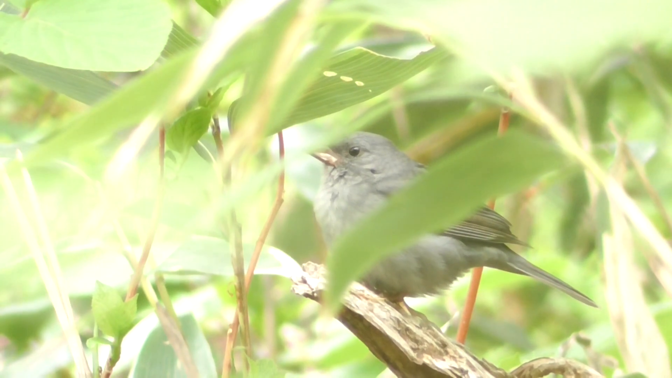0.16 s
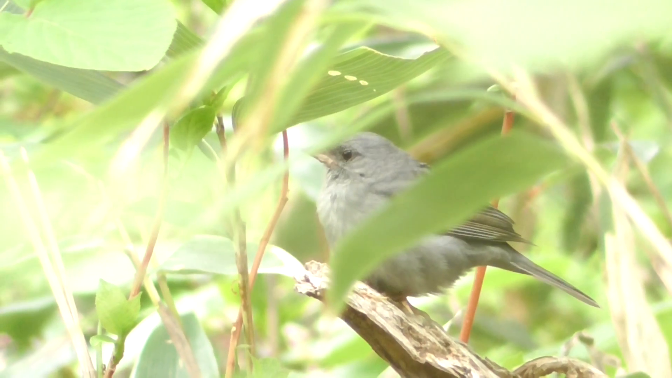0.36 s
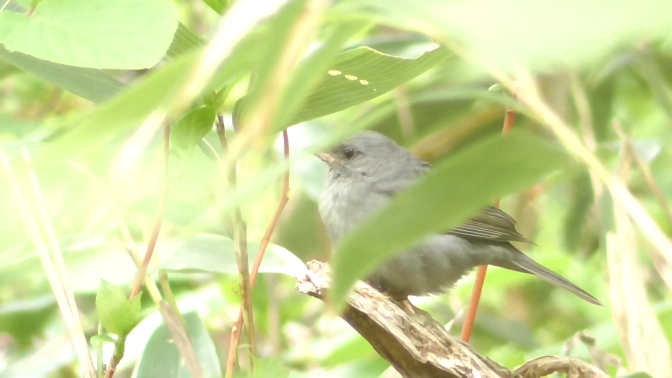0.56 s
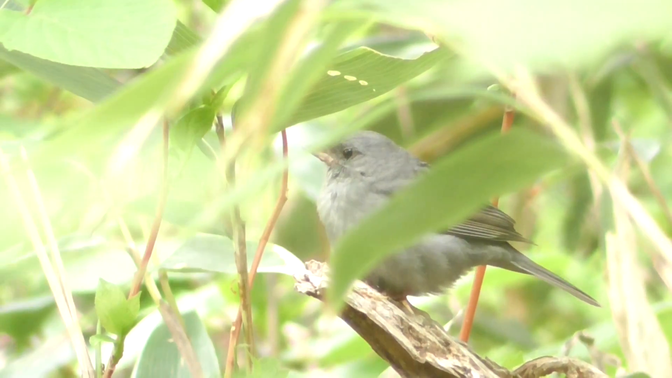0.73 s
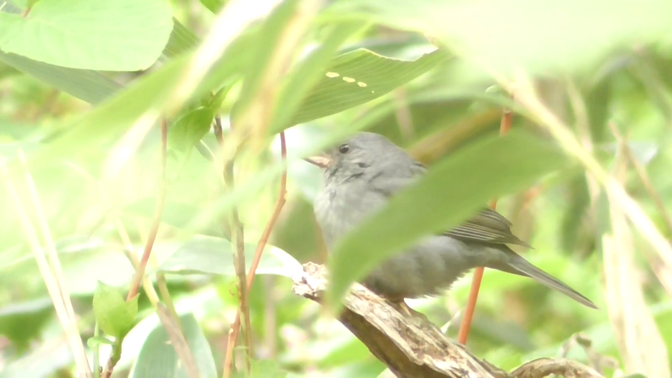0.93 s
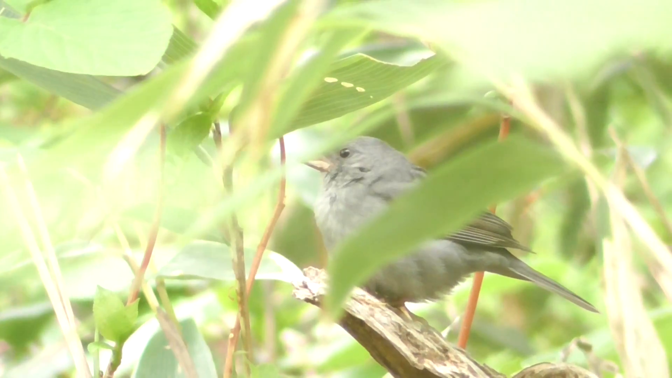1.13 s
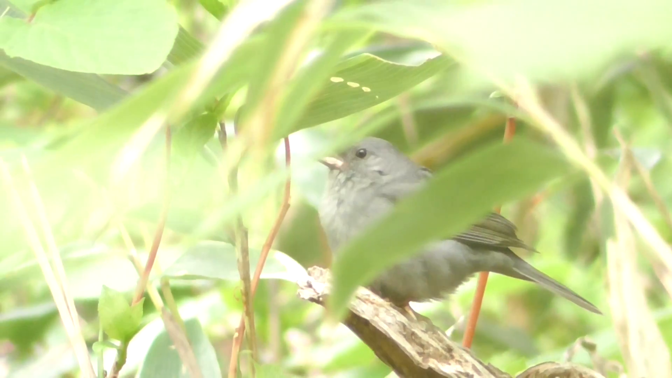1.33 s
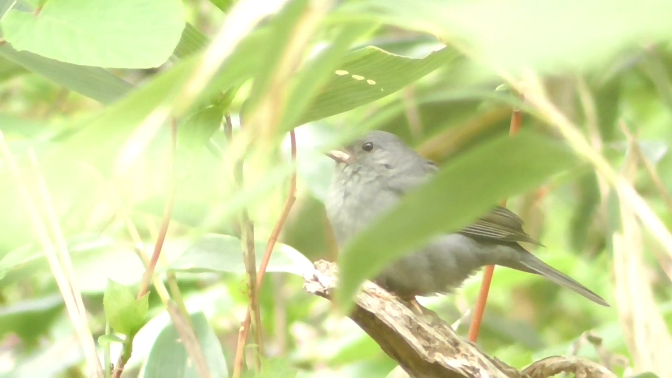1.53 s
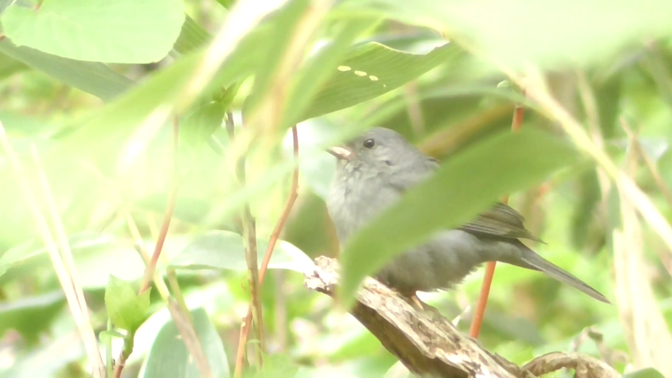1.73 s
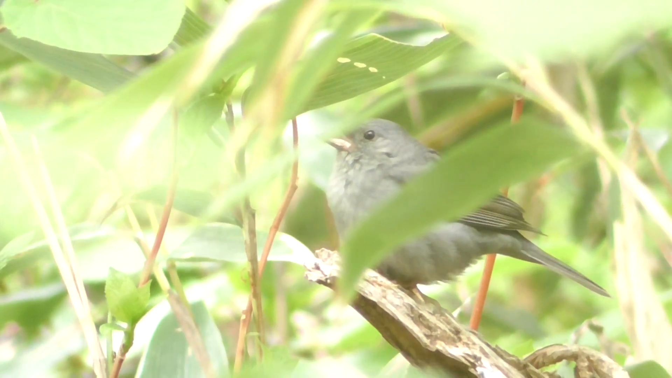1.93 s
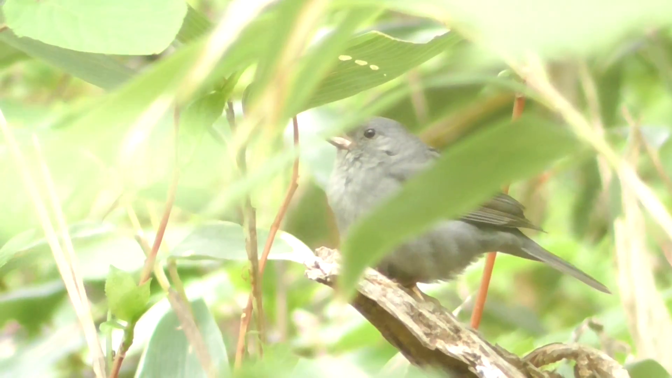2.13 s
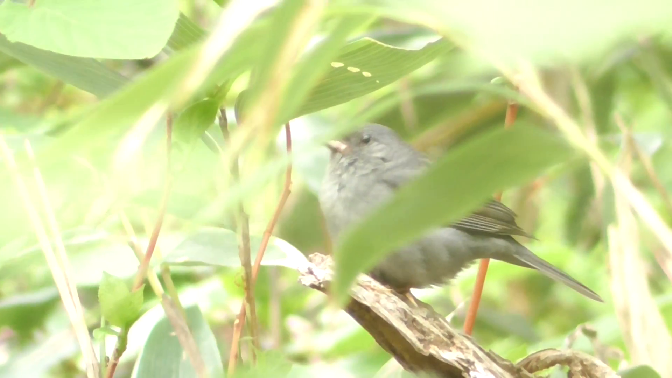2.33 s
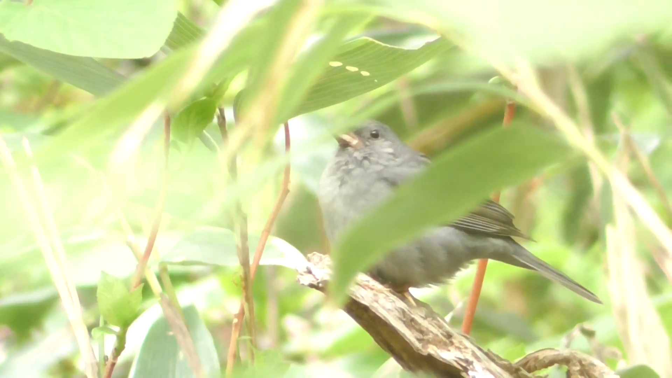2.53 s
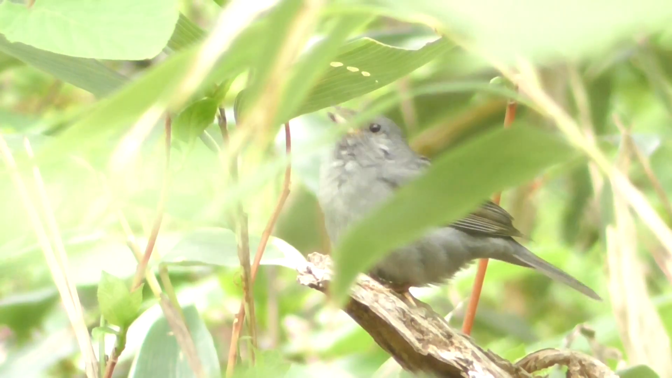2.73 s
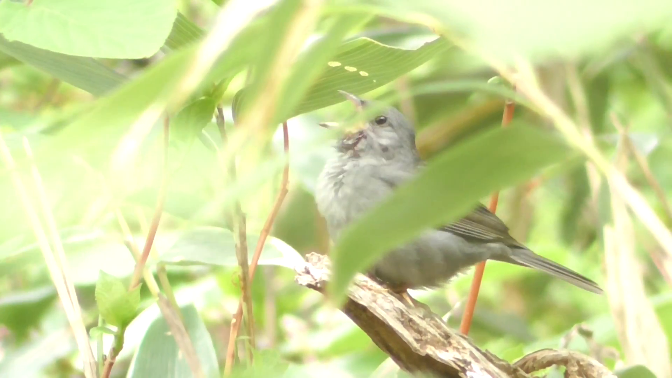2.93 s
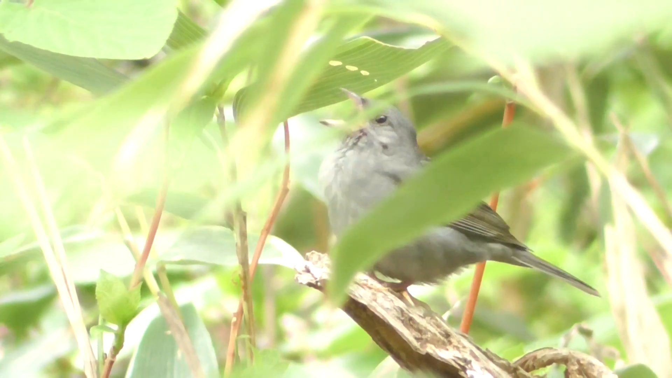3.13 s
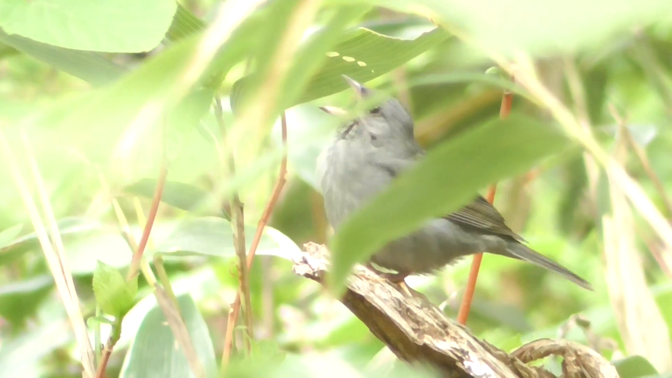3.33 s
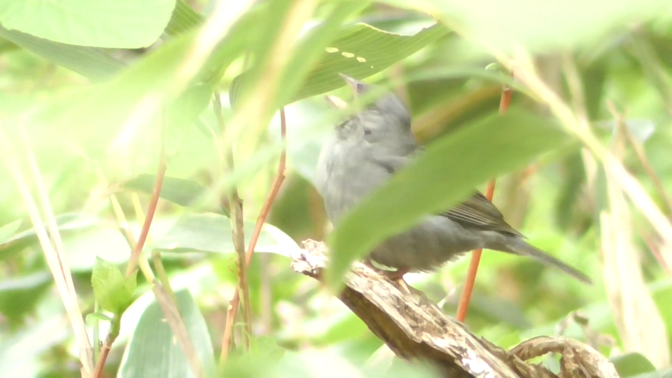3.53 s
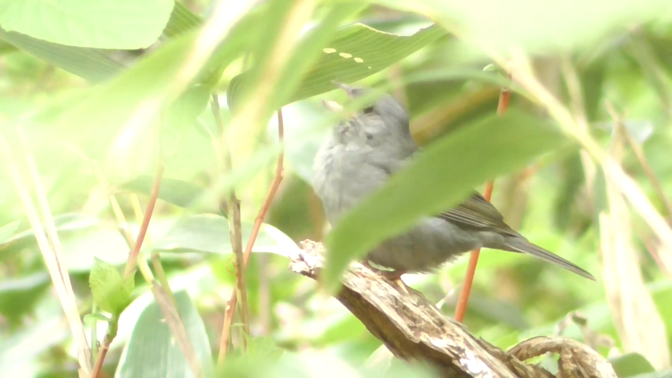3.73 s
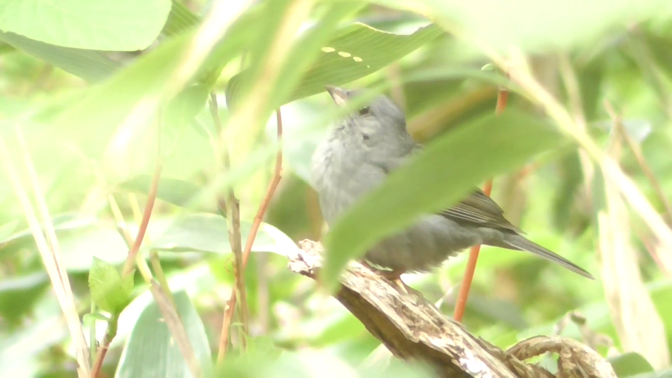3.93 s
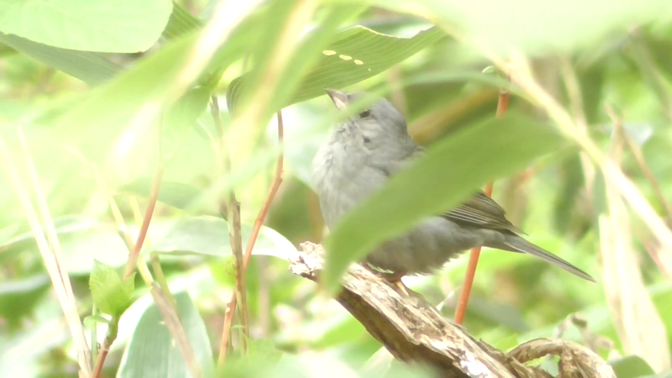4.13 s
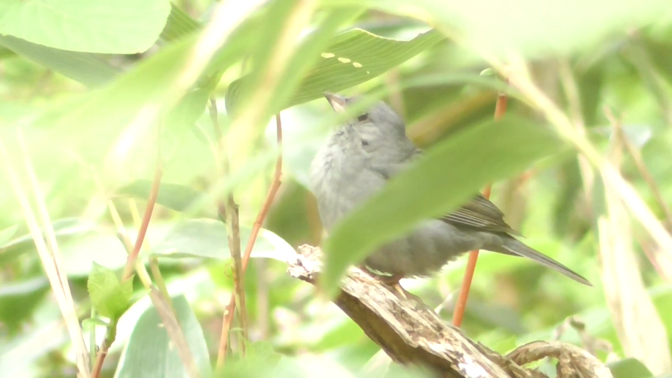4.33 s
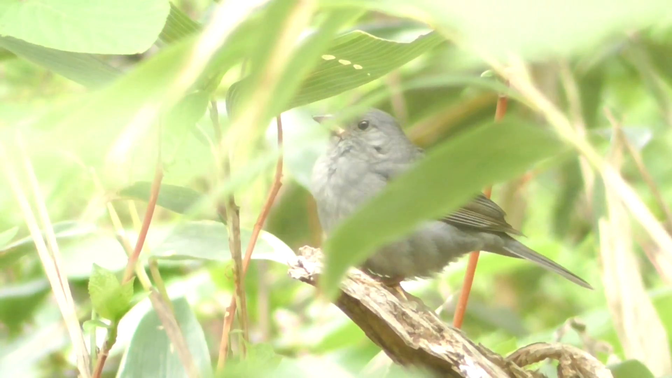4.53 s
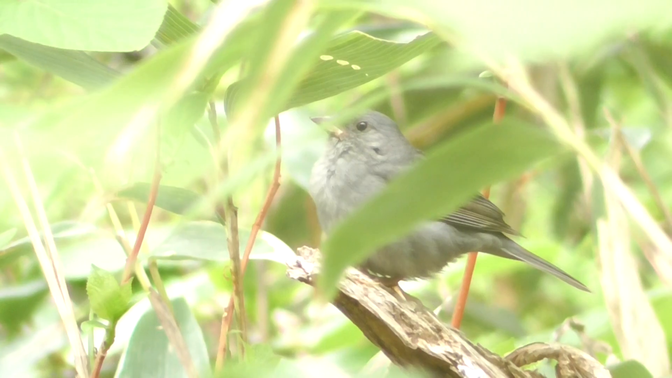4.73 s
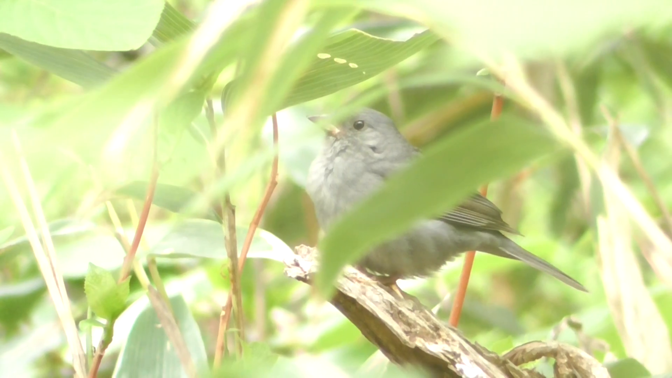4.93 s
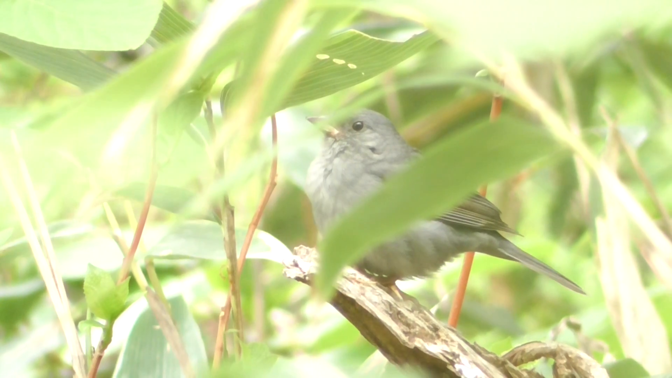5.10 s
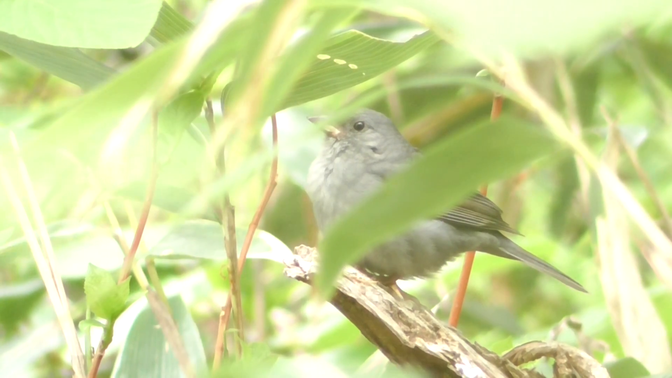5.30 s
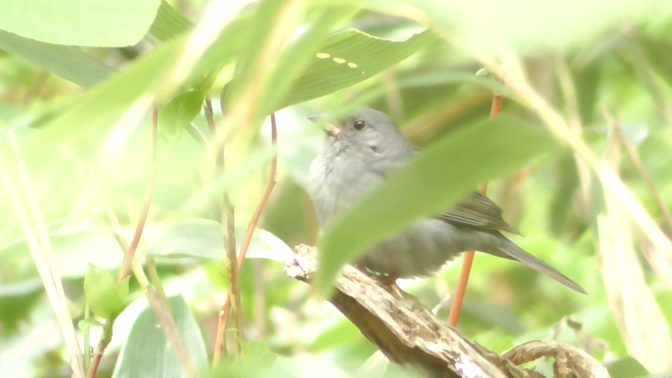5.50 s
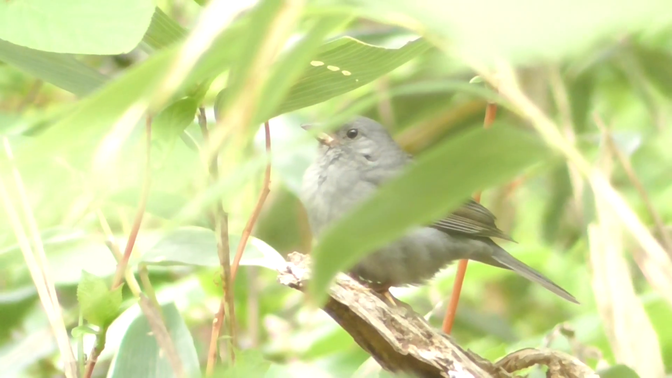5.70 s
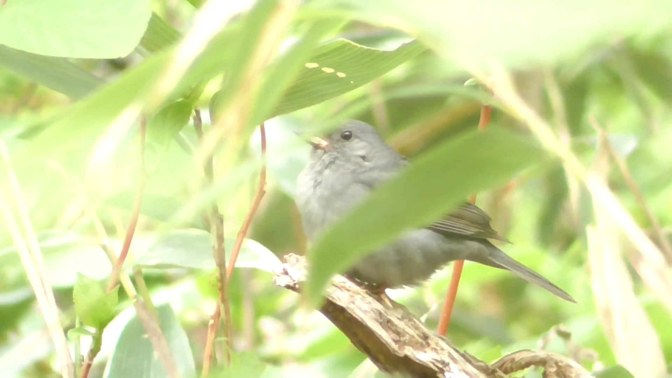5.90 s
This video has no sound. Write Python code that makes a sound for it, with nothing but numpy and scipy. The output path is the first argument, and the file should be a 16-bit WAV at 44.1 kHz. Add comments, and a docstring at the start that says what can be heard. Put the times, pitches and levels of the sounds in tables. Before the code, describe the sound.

In a leafy wood, a chorus of short, pulsing frog croaks comes from the left above faint steady hiss and rumble. Far birds add a thin held note and a soft trill. Midway, a small bird straight ahead of the microphone sings one loud phrase: a rising whistle, two sharp falling ones and one that dips and climbs, with a short echo. Croaking continues, with a few faint far notes and a tiny twig tick.

```python
"""Frogs croak in throbbing bursts on the left, over a low rumble and soft microphone hiss.
Each croak is a few throat pulses ringing a vocal sac. A twig ticks; far birds give faint held
notes and a trill, blurred by the trees. About 3 s in, the main source, a small bird in a thicket,
sings four quick slurred whistles: near-sine glides that echo off trunks and leaves."""
import sys
import numpy as np
from scipy import signal
from scipy.fft import rfft, irfft
from scipy.io import wavfile
from scipy.ndimage import uniform_filter1d

SR = 44100
rng = np.random.default_rng(int(sys.argv[2]) if len(sys.argv) > 2 else 0)


def output_pcm(signal):
    """Save a mono or channel-first signal as 16-bit PCM at the path in sys.argv[1].

    Samples are clipped to [-1, 1] before scaling.
    """
    pcm = np.clip(np.atleast_2d(signal).T, -1, 1) * 32767
    wavfile.write(sys.argv[1], SR, np.round(pcm).astype(np.int16))


N = 262836

# rumble and hiss (frequency [Hz], relative density [dB])
NOISE_SPECTRUM = [(25, -23.5), (60, -17), (114, -16.5), (231, -7), (548, -12), (1100, -9), (2100, -19.5),
                  (2780, -27), (4940, -27), (6250, -31), (8110, -26), (11000, -28), (13400, -27),
                  (15600, -32)]
# noise width (frequency [Hz], side over mid [dB])
NOISE_SIDE = [(30, 11), (70, -0.5), (350, 1.7), (1000, -2.0), (14000, -1.3)]
# echo decay (frequency [Hz], T60 [s])
ECHO_T60 = [(1000, 1), (3000, 0.7), (4700, 0.82), (7000, 0.74), (12000, 0.28)]
# far birds (start [s], end [s], start pitch [Hz], end pitch [Hz], start level [dB], end level [dB])
HELD_NOTES = [(0.148, 0.937, 5200, 5090, -85.5, -77), (0.885, 0.908, 4310, 4460, -69, -63),
              (.905, 1.11, 4530, 4596, -63, -76), (5.21, 5.278, 5150, 5070, -87, -91),
              (5.294, 5.38, 8700, 8760, -78, -83), (5.42, 5.523, 8400, 8340, -78, -85),
              (5.87, 5.96, 3210, 3180, -78, -82)]
# twig (time [s], level [dB], ring [Hz])
TWIG_TICKS = [(.334, -48.5, 6400), (0.345, -57, 3800), (.592, -60, 7140), (5.565, -61.5, 5370)]
# near frogs (time [s], peak [dB], pitch [Hz], fade per pulse [dB])
NEAR_CROAKS = [(0.038, -46, 956, 18), (0.307, -46, 1135, 23), (0.374, -43, 1323, 4),
               (0.444, -41, 1342, 1.5), (0.521, -47.5, 1238, 0.5), (0.536, -42.5, 1345, 9),
               (0.672, -50, 1200, 15), (0.752, -48, 1093, 14), (0.862, -49, 1130, 11),
               (0.943, -42, 1320, 7), (1.017, -50, 1086, 5), (1.039, -42.5, 1390, 3.5),
               (1.109, -46, 1040.0, 2), (1.141, -41, 1312, 5), (1.226, -46, 1194, 8), (1.272, -44, 1055, 3),
               (1.344, -41.5, 1257, 19), (1.411, -46.5, 1176, -2), (1.493, -41.5, 1200, 15),
               (1.515, -42.5, 1145, 17), (1.582, -47, 1306, 16), (1.74, -46, 1107, 13),
               (1.823, -44.5, 1100, 3), (1.914, -45.5, 1055, 4), (2.022, -46, 1020.0, 6),
               (2.097, -44, 1253, 14), (2.212, -47, 984, 16), (2.316, -60, 1110, -3), (2.693, -45, 1168, 7),
               (2.762, -43.5, 940, 8), (2.823, -42.5, 1117, 3), (2.866, -48.5, 1195, 8.0),
               (2.907, -41, 1013, 6), (2.991, -39.5, 940, 7.5), (3.088, -40.5, 951.2, 13),
               (3.411, -43.5, 1314, 15), (3.626, -49, 1256, 13), (3.816, -48, 934, 12),
               (3.892, -45.5, 1100, 21), (3.98, -46, 1140, 20), (4.005, -51.5, 972, -6),
               (4.07, -47.5, 1050.0, 4.0), (4.165, -44.5, 1070, 6), (4.227, -45.5, 940, 4),
               (4.337, -47, 1115, 13), (4.381, -43, 1246, 12), (4.418, -43, 1340, -2),
               (4.461, -44, 1280, 32), (4.51, -45.5, 1312, 7), (4.548, -44.5, 1274, 8.0),
               (4.609, -45, 1333, 3), (4.861, -45.5, 1130, 2.0), (4.933, -42, 1367, 12),
               (5.007, -39.5, 1230, 22), (5.361, -46.5, 1210, 5), (5.418, -47.5, 1090, 14),
               (5.454, -43, 1186, 8), (5.608, -43.5, 1262, 9), (5.906, -46, 1040, 19)]
# smaller frog (time [s], peak [dB])
FROG_KNOCKS = [(1.344, -59), (1.428, -56), (1.516, -61), (1.677, -70), (1.75, -61), (1.831, -55),
               (1.912, -49), (2.319, -54), (2.518, -53), (2.694, -53), (2.865, -53.5), (3.041, -55),
               (3.225, -52.5), (3.406, -52.5), (3.599, -57)]
# weaker frogs (time [s], typical peak [dB], centre pitch [Hz])
CHORUS_CONTOUR = [(0.0, -76, 920), (0.25, -52, 1140), (0.48, -56, 1110), (0.78, -56, 1119),
                  (1.29, -50.5, 1163), (1.68, -54.5, 1104), (2.14, -52, 1102), (2.51, -49, 1204),
                  (2.75, -57, 1070), (3.141, -53.5, 1051), (3.6, -49, 1189), (3.92, -55, 1078),
                  (4.45, -53.5, 1150), (4.71, -57, 1020), (4.98, -54, 1095), (5.28, -61, 983),
                  (5.59, -55.5, 1122), (5.96, -52, 1028)]
# singer's overtones (multiple, level before the beak [dB])
VOICE_OVERTONES = [(2, 0.5), (3, 3.5), (4, -9)]
# open beak's response to overtones (frequency [Hz], gain [dB])
BEAK_GAIN = [(6000, -36), (7500, -32), (8600, -30.5), (9600, -32.5), (11300, -18), (12800, -17.5),
             (14300, -26), (15600, -36)]
# three slurs (time into slur [s], pitch [Hz], relative level [dB])
RISE = [(0, 3015, -31), (0.023, 3090, -16), (.068, 3297, -7.5), (0.117, 3478, -2.5), (.168, 3676, -4),
        (.208, 3768, 0.5), (.263, 3812, -4), (.276, 3560, -23.5)]
FALL = [(0, 10450, -42), (.007, 9150, -19), (.027, 7886, -13.5), (0.046, 7090, -7.5), (0.076, 5536, -10),
        (.088, 4770, -14.5), (.099, 4350, -8), (0.139, 4166, -1.5), (0.146, 4100, -14)]
DIP = [(0, 3760, -15), (.018, 3720, -6), (.032, 3310, -1), (.05, 2780, -9), (.072, 2616, -19.5),
       (.086, 2924, -32), (.093, 3764, -9.5), (.108, 4177, 1.5), (.136, 4580, -0.5), (.156, 4788, 0),
       (.167, 4680, -0.5)]
# whistles (start [s], slur, level [dB])
SONG = [(2.882, RISE, -35.5), (3.253, FALL, -30), (3.46, FALL, -31), (3.674, DIP, -37.5)]

NOISE_RMS_DB, CUTOFF_HZ = -59.5, 15750
TRILL_RATE_HZ, TRILL_HIGH_HZ, TRILL_LOW_HZ = 19, 5120, 3040
TRILL_START_S, TRILL_END_S, TRILL_DB, TRILL_SWELL_DB = 0.9, 2.07, -74.5, 7
SLACK_SAC_HZ, KNOCK_HZ, KNOCK_CLIMB_HZ_PER_S = 905, 2014, 48
FROG_PAN_DB, CHORUS_PAN_DB, PAN_SPREAD_DB, CHORUS_CALLS = 9.5, 7, 1, 900
WARBLE_RATE_HZ, WARBLE_DEPTH_HZ, WARBLE_FROM_HZ, WARBLE_FULL_HZ = 170.6, 537, 5400, 6500


def undb(db):
    """Decibels to gain."""
    return 10 ** (np.asarray(db) / 20)


def curve_at(table, hz):
    """Interpolate (frequency [Hz], value) on a log axis."""
    table_hz, values = np.transpose(table)
    return np.interp(np.log(hz + 1), np.log(table_hz), values)


def pan(x, db):
    """Place by left minus right level."""
    return x * undb(np.array([[db / 2], [-db / 2]]))


def add(out, start_s, sound):
    """Mix a sound in at start_s."""
    i = int(start_s * SR)
    out[..., i:i + sound.shape[-1]] += sound[..., :N - i]


def rumble_and_hiss():
    """Steady coloured mid/side noise; the deepest rumble is mostly side."""
    hz = np.arange(N // 2 + 1) * SR / N
    mid, side = (irfft(rfft(rng.standard_normal(N)) * undb(curve_at(NOISE_SPECTRUM, hz) + db), N)
                 for db in (0, curve_at(NOISE_SIDE, hz)))
    noise = pan(np.array([mid + side, mid - side]), -0.88)
    return noise * undb(NOISE_RMS_DB) / np.sqrt(np.mean(noise ** 2))


def tree_echoes(dry, gap_s, scatter_db, common_gain):
    """Echoes off trunks and leaves: uneven, then a smooth wash; each band has its own decay."""
    t = np.arange(int(1.2 * SR)) / SR
    common, left, right = rng.standard_normal((3, len(t)))
    clumps = np.repeat(rng.standard_normal(len(t) // 64 + 1), 64)[:len(t)] * np.exp(-t / .04)
    spectrum = rfft((common_gain * common + np.array([left, right])) * undb(scatter_db * clumps))
    hz = np.arange(len(t) // 2 + 1) * SR / len(t) + 1
    tail = 0
    for centre_hz in 500 * 2. ** np.arange(0, 5.1, .5):
        band = np.clip(1 - 2 * abs(np.log2(hz / centre_hz)), 0, 1)
        tail += irfft(spectrum * band, len(t)) * undb(-60 * t / curve_at(ECHO_T60, centre_hz))
    tail *= 1 - np.exp(-(t / gap_s) ** 2)  # gap to the nearest trunks
    tail /= np.sqrt(np.sum(tail ** 2) / 2)
    return signal.fftconvolve(dry[None], tail, axes=1)[:, :N]


def far_birds():
    """Wavering held notes and an uneven trill of falling slurs."""
    out = np.zeros(N)
    for start_s, end_s, from_hz, to_hz, from_db, to_db in HELD_NOTES:
        count = int((end_s - start_s) * SR)
        waver = 1 + 0.16 * uniform_filter1d(rng.standard_normal(count), size=600)
        hz = np.linspace(from_hz, to_hz, count) * waver
        note = np.sin(2 * np.pi * np.cumsum(hz) / SR) * signal.windows.tukey(count, .2)
        add(out, start_s, np.sqrt(2) * note * undb(np.linspace(from_db, to_db, count)))
    t = np.arange(int(SR / TRILL_RATE_HZ)) / SR
    starts_s = np.arange(TRILL_START_S, TRILL_END_S, 1 / TRILL_RATE_HZ)
    for start_s, (late, high, size) in zip(starts_s, rng.standard_normal((40, 3))):
        top_hz = TRILL_HIGH_HZ * (1 + 0.063 * high)
        hz = TRILL_LOW_HZ + (top_hz - TRILL_LOW_HZ) * (1 - t / t[-1]) ** 1.5
        slur = np.sin(2 * np.pi * np.cumsum(hz) / SR) * signal.windows.tukey(len(t), .4)
        progress = (start_s - TRILL_START_S) / (TRILL_END_S - TRILL_START_S)
        swell_db = TRILL_SWELL_DB * np.sin(np.pi * progress ** 0.68)
        add(out, start_s + .006 * late, np.sqrt(2) * slur * undb(TRILL_DB + swell_db + 1.9 * size))
    return out


def twig(t60_s=0.011):
    """Dry ticks: a broadband crack with a very short ring."""
    out, t = np.zeros(N), np.arange(int(0.012 * SR)) / SR
    for start_s, db, ring_hz in TWIG_TICKS:
        crack = 0.91 * rng.standard_normal(len(t))
        ring = np.sin(2 * np.pi * ring_hz * t)
        add(out, start_s, (ring + crack) * undb(db - 60 * t / t60_s))
    return out


def croak(hz, jitter, t60_s, under_db, spacing_cycles=0, fade_db=0, sag=0):
    """One throat pulse per jitter row rings two sac modes; pitch and level sag as the sac slackens."""
    t = np.arange(int(.025 * SR)) / SR
    out = np.zeros(int(.07 * SR))
    envelope = undb(-60 * t / t60_s) * (1 - np.exp(-(t * hz / .9) ** 2))
    for k, (late, size) in enumerate(jitter):
        pulse_hz = SLACK_SAC_HZ + (hz - SLACK_SAC_HZ) * (1 - sag) ** k
        phase = 2 * np.pi * pulse_hz * t
        modes = np.sin(phase) + undb(under_db) * np.sin(.77 * phase)
        start_s = max(spacing_cycles / hz * (k + .15 * late * (k > 0)), 0)
        pulse_db = -fade_db * k + 1.5 * size * (k > 0)
        add(out, start_s, modes * envelope * undb(pulse_db))
    return out / abs(out).max()


def frogs():
    """Three-pulse near croaks, single high knocks and a randomly timed two-pulse chorus."""
    out = np.zeros((2, N))
    for start_s, db, hz, fade_db in NEAR_CROAKS:
        jitter = rng.standard_normal((4, 2))
        call = croak(hz, jitter[:3], t60_s=0.025, under_db=-8,
                     spacing_cycles=11.5, fade_db=max(fade_db, 0), sag=0.35)
        add(out, start_s, pan(undb(db) * call, FROG_PAN_DB + PAN_SPREAD_DB * jitter[3, 0]))
    for start_s, db in FROG_KNOCKS:
        hz = KNOCK_HZ + KNOCK_CLIMB_HZ_PER_S * (start_s - FROG_KNOCKS[0][0])
        knock = croak(hz, [(0, 0)], t60_s=0.028, under_db=-7)
        add(out, start_s, pan(undb(db) * knock, FROG_PAN_DB))
    times_s, chorus_db, centre_hz = np.transpose(CHORUS_CONTOUR)
    for start_s in rng.random(CHORUS_CALLS) * (N - 1) / SR:
        jitter = rng.standard_normal((4, 2))
        size, (detune, side) = jitter[2, 0], jitter[3]
        hz = np.interp(start_s, times_s, centre_hz) * np.exp(0.1804 * np.clip(detune, -1.6, 1.6))
        db = np.interp(start_s, times_s, chorus_db) + 2.7 * np.clip(size, -3, 1.2)
        call = croak(hz, jitter[:2], t60_s=0.018, under_db=-17.5,
                     spacing_cycles=9.5, fade_db=5.5, sag=0.16)
        add(out, start_s, pan(undb(db) * call, CHORUS_PAN_DB + PAN_SPREAD_DB * side))
    return out


def singer(edge_s=0.0019):
    """Near-sine voice with a fast warble at high pitch; the beak favours overtones near 12 kHz."""
    out = np.zeros(N)
    for start_s, slur, level_db in SONG:
        times_s, pitch_hz, contour_db = np.transpose(slur)
        t = np.arange(0, times_s[-1], 1 / SR)
        glide_hz = np.interp(t, times_s, pitch_hz)
        height = np.clip((glide_hz - WARBLE_FROM_HZ) / (WARBLE_FULL_HZ - WARBLE_FROM_HZ), 0, 1)
        onset = np.clip(t / times_s[1], 0, 1)
        warble = height * onset * np.cos(2 * np.pi * WARBLE_RATE_HZ * (t - times_s[1]))
        hz = glide_hz - WARBLE_DEPTH_HZ * warble
        phase = 2 * np.pi * np.cumsum(hz) / SR
        tone = np.sin(phase)
        for k, db in VOICE_OVERTONES:
            in_band = k * hz < .45 * SR
            tone += in_band * undb(db + curve_at(BEAK_GAIN, k * hz)) * np.sin(k * phase)
        swell = 1 + 0.28 * warble  # louder in each pitch trough
        edges = np.clip(np.minimum(t, times_s[-1] - t) / edge_s, 0, 1)
        envelope = swell * edges * undb(level_db + np.interp(t, times_s, contour_db))
        add(out, start_s, np.sqrt(2) * tone * envelope)
    return out


def scene():
    """Singer and frogs direct and echoed, far birds echoed only, twig and noise dry."""
    song, croaks = singer(), frogs()
    song_echo = tree_echoes(undb(2) * song, gap_s=0.0012, scatter_db=7, common_gain=1.1)
    far_echo = tree_echoes(far_birds(), gap_s=0.0053, scatter_db=-1, common_gain=0.78)
    frog_echo = tree_echoes(croaks.mean(axis=0), gap_s=0.018, scatter_db=-15, common_gain=0.98)
    background = far_echo + twig() + rumble_and_hiss()
    return background + croaks + pan(undb(-7.5) * frog_echo, 3.1) + pan(song, .4) + pan(song_echo, 0.71)


def record(dry):
    """The recorder's steep low-pass."""
    return signal.sosfilt(signal.ellip(10, .2, 70, CUTOFF_HZ, fs=SR, output="sos"), dry)


dry = scene()
out = record(dry)
output_pcm(out)
```